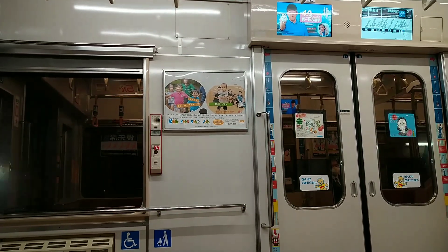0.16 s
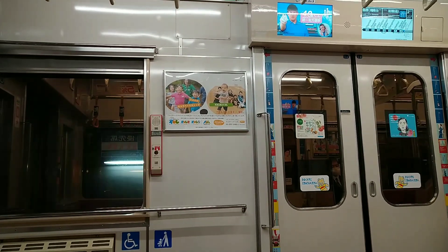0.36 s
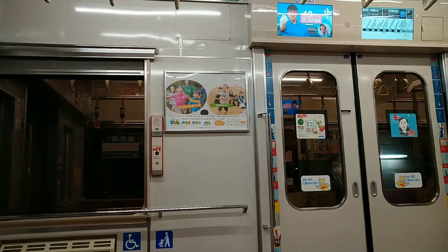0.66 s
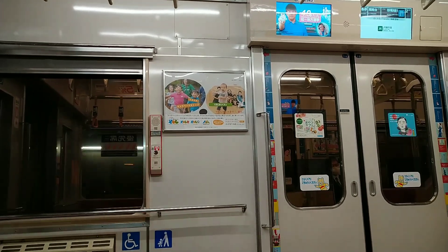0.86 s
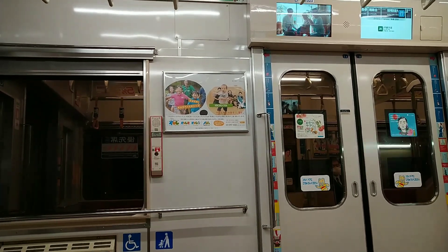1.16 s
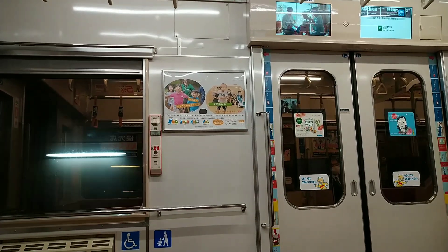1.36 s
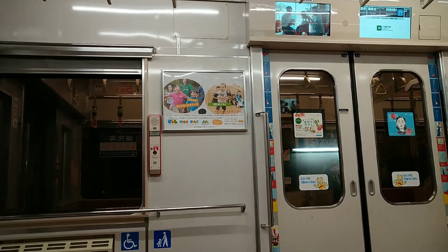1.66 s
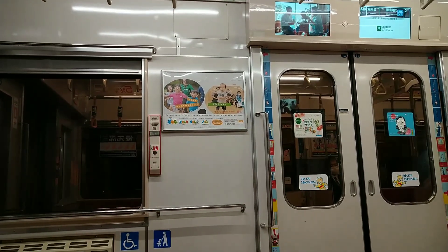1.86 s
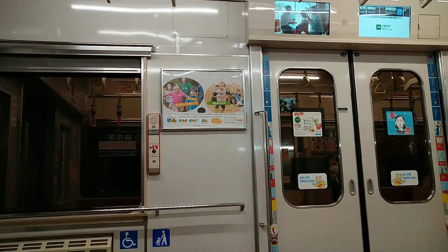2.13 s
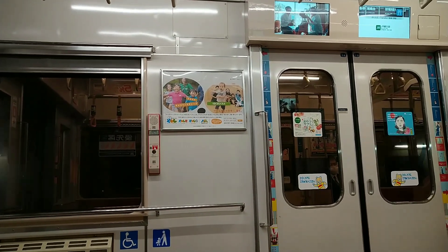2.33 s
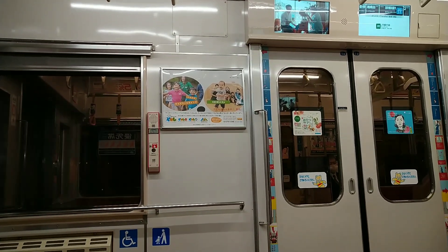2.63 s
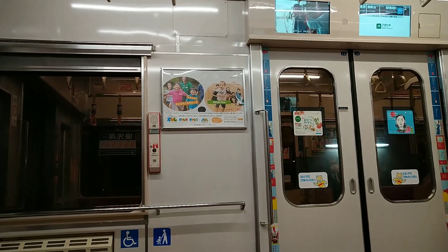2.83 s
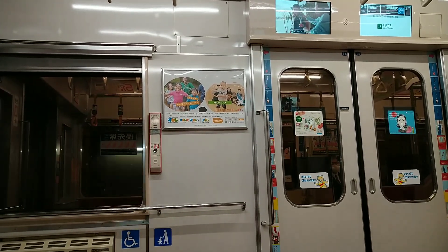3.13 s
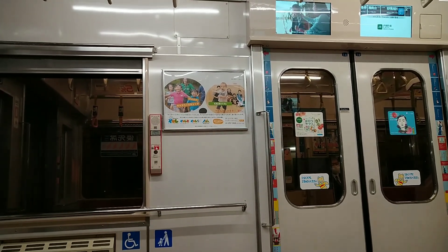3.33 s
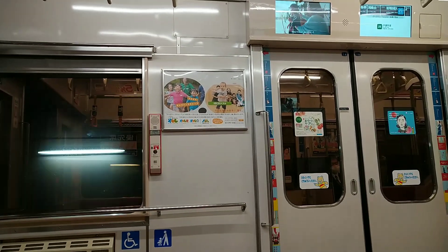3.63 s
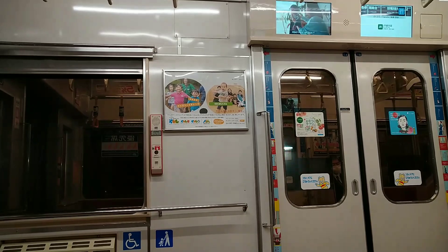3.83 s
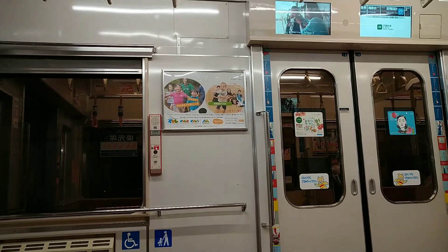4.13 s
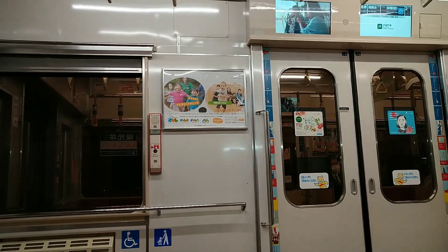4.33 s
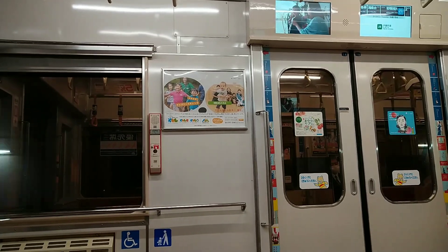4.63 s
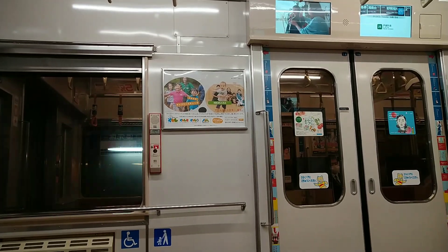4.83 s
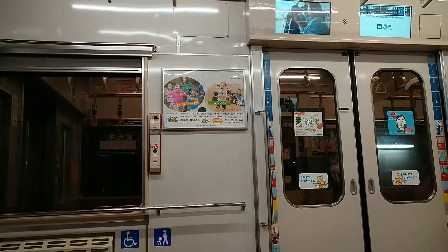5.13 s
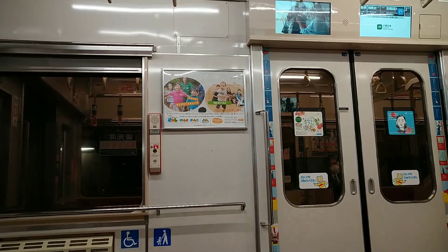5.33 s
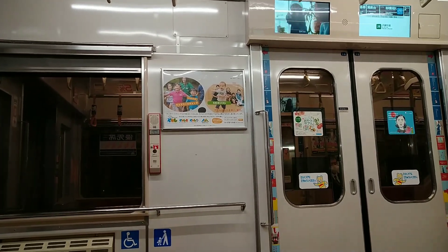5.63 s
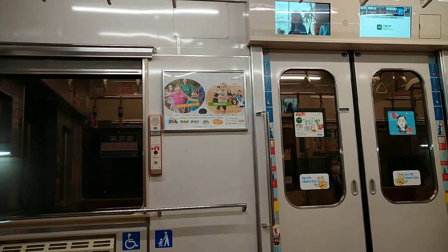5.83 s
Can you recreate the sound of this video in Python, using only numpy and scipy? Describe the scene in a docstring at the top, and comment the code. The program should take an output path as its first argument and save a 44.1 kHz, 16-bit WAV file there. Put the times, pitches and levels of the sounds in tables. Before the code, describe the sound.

The interior of an electric train running at steady speed through a tunnel, picked up in mono inside the car, with little deep bass or extreme treble. A thick, uneven low rumble runs throughout, under a midrange track roar and a thin steely ring. In the first 0.6 seconds worn track shakes the bogie, with two soft joint knocks around 0.1 to 0.2. The ride then smooths: a low drive hum slowly sinks, the bogie groans in swells, and a hollow rail howl wavers, dipping near 1.7, rising around 2.6 to 3.4, fading, then returning near 3.9. Short soft body booms come at about 3.3, 3.6 and 4.1. From 4.8 to 5.5 rougher shaking brings a cluster of dull floor thuds, strongest near 5.15. The main wheel ring weakens, other wheel tones sing faintly, and door-seal air hiss grows slightly. Rumbling continues to the end at 6 seconds.

```python
"""Inside an electric train running at steady speed through a tunnel.
From the start, random wheel and rail roughness drives the body's rumble, the track's roar and the steel's ring.
The rail howls, the bogie groans, the drive hums as drifting narrow bands, and air hisses at the door seals;
early on, worn track shakes the bogie and two joints knock decaying floor modes.
From the middle on, dips make the body boom as the hum sinks; near the end wear and joints thud
again, the strongest wheel mode is damped, and other wheel modes begin to sing faintly."""
import sys
import numpy as np
from scipy import signal
from scipy.fft import rfft, irfft, next_fast_len
from scipy.io import wavfile
from scipy.ndimage import uniform_filter1d

SR = 44100
rng = np.random.default_rng(int(sys.argv[2]) if len(sys.argv) > 2 else 0)


def transcribe(signal):
    """Save signal, clipped to [-1, 1], as a 16-bit WAV file at the path in sys.argv[1]."""
    frames = np.atleast_2d(signal).T
    limited = np.clip(frames, -1, 1)
    pcm = np.round(limited * 32767).astype(np.int16)
    wavfile.write(sys.argv[1], SR, pcm)


N = 263718


def from_db(db):
    """Amplitude ratio of a level: 20 dB is a factor of ten."""
    return 10 ** (np.asarray(db) / 20)


def seconds():
    """Sampling: the time of every sample."""
    return np.arange(N) / SR


def in_time(rows):
    """Linear interpolation of each column after the time, at every sample."""
    s, *columns = np.transpose(rows)
    return [np.interp(seconds(), s, column) for column in columns]


def ramp(start_s, rise_s):
    """Linear onset: rises from 0 to 1 and stays there."""
    return np.clip((seconds() - start_s) / rise_s, 0, 1)


def swell(centre_s, half_s):
    """Gaussian envelope of height 1, down to 1/e at half_s from its centre."""
    return np.exp(-((seconds() - centre_s) / half_s) ** 2)


def rms_one(x):
    """Normalisation to unit mean power."""
    return x / np.sqrt(np.mean(x ** 2) + 1e-20)


def steady(x, span_s):
    """Power levelling: holds the running power at 1 over this span; faster flutter stays."""
    span = max(int(span_s * SR), 2)
    return x / np.sqrt(uniform_filter1d(x ** 2, span) + 1e-20)


def drift(rate_hz):
    """Low-passed noise of spread 1, whose spectrum is 6 dB down at rate_hz."""
    size = next_fast_len(N, True)
    hz = np.arange(size // 2 + 1) * SR / size
    low_pass = (hz > 0) / (1 + (hz / rate_hz) ** 2)
    return rms_one(irfft(rfft(rng.standard_normal(size)) * low_pass, size)[:N])


def resonance(x, hz, width_hz):
    """Two-pole resonator with gain 1 at its peak: damping sets the bandwidth."""
    r = np.exp(-np.pi * width_hz / SR)
    feedback = [1, -2 * r * np.cos(2 * np.pi * hz / SR), r * r]
    return signal.lfilter(np.array([1, 0, -1]) * (1 - r * r) / 2, feedback, x)


def ring(force, hz, t60):
    """Impulse response of a damped mode: a unit click starts a sine that falls 60 dB in t60."""
    r = from_db(-60 / (t60 * SR))
    w = 2 * np.pi * hz / SR
    return signal.lfilter([0, np.sin(w)], [1, -2 * r * np.cos(w), r * r], force + 1e-18)


def shaken(colour, modes, steady_s):
    """Random excitation of a structure: coloured noise with resonances on top, at unit power."""
    points_hz, points_db = np.transpose(colour)
    hz = np.maximum(np.arange(N // 2 + 1) * SR / N, 1)
    # beyond the outer points the level falls by 12 dB an octave
    skirts = np.minimum(hz / points_hz[0], 1) ** 2 * np.minimum(points_hz[-1] / hz, 1) ** 2
    gain = skirts * from_db(np.interp(np.log(hz), np.log(points_hz), points_db))
    x = irfft(rfft(rng.standard_normal(N)) * gain, N)
    for mode_hz, width_hz, lift_db in modes:
        x = x + (from_db(lift_db) - 1) * resonance(x, mode_hz, width_hz)
    return steady(rms_one(x), steady_s)


def narrow_band(hz, half_width_hz):
    """Quadrature modulation: a carrier of wandering strength and phase fills a narrow band; unit power."""
    phase = 2 * np.pi * np.cumsum(hz * np.ones(N)) / SR
    in_phase = drift(half_width_hz) * np.cos(phase)
    quadrature = drift(half_width_hz) * np.sin(phase)
    return rms_one(in_phase + quadrature)


def drone(hz, half_width_hz, steady_s):
    """Narrow-band random vibration of a resonance, levelled to even strength at unit power."""
    return steady(narrow_band(hz, half_width_hz), steady_s)


def rolling(turns_hz, throb_db):
    """Roughness excitation: wheels on the rail drive rumble, roar and ring; wheel load modulates the rail sounds."""
    # level of the car body's rumble before wear adds to it: t/s, level/dB
    rumble = [(0, -26.5), (.85, -28.5), (2.1, -28), (2.45, -29), (3.0, -28), (4.3, -28.5), (4.65, -28),
              (5.06, -31), (5.3, -29), (5.98, -31)]
    # broad spectra of body, track roar and steel ring: f/Hz, relative density level/dB
    body_colour = [(60, -26.5), (85, -15.5), (108, -2), (150, 0), (195, 1.5), (230, -3.5), (262, 0),
                   (305, -1), (365, -3.5), (435, -11.5), (700, -35.5)]
    track_colour = [(300, -9), (430, -3.5), (480, 0.5), (545, -0.5), (610, -3.5), (770, -4.5), (900, -4),
                    (1020, -5.5), (1200, -9.5), (1500, -19), (2500, -42.5)]
    steel_colour = [(900, -10), (1280, -1.5), (1520, -3), (1900, -0.5), (2200, 2), (2560, 0), (2720, -5.5),
                    (3100, -8), (3350, -11), (3750, -15.5), (4100, -15), (4600, -26.5), (5400, -28.5),
                    (8000, -58)]
    # spectrum of the extra shaking on worn track: f/Hz, relative density level/dB
    worn_colour = [(30, -31.5), (48, -9), (80, -7.5), (135, -1.5), (225, -12.5), (315, 2.5), (420, 3.5),
                   (540, 2.5), (640, -3.5), (800, -4.5), (1000, -9), (1300, -23.5)]
    # resonances standing out of those spectra: f/Hz, bandwidth f/Hz, lift level/dB (negative: a dip)
    body_modes = [(143, 8.7, 1.5), (190, 8.3, -0.5)]
    track_modes = [(725, 28, 2.9), (826, 14, 5.8), (930, 75, 1.4)]
    steel_modes = [(1808, 160, 4.9), (2315, 280, 2.1), (3130, 100, 2.2), (3900, 140, 1.4)]
    worn_modes = [(715, 12, 8.7), (822, 18, 4.9)]
    track_start_db, steel_start_db, easing_db_per_s = -32.5, -36.5, 0.17
    body_share_of_wear = 0.43

    wear = worn_track()
    rumble_db, = in_time(rumble)
    body_gain = from_db(rumble_db) + body_share_of_wear * wear
    body = body_gain * shaken(body_colour, body_modes, steady_s=0.15)
    track = from_db(track_start_db) * shaken(track_colour, track_modes, steady_s=0.32)
    steel = from_db(steel_start_db) * shaken(steel_colour, steel_modes, steady_s=0.77)
    bogie = wear * shaken(worn_colour, worn_modes, steady_s=0.18)
    easing = from_db(-easing_db_per_s * seconds())
    # a wheel is never quite round: its load swings once a turn
    turns = np.cumsum(turns_hz * (1 + 0.01 * drift(0.98))) / SR
    load = from_db(throb_db * np.cos(2 * np.pi * turns))
    rail_sounds = easing * (track + steel) + rail_howl() + wheel_ring()
    return body + bogie + bogie_groan() + load * rail_sounds


def worn_track():
    """Exponential attenuation: the shaking grows as worn track nears, holds over it and dies away behind."""
    # stretches of worn track under the bogie: start t/s, length t/s, level/dB
    stretches = [(0.04, 0.57, -38.5), (4.84, 0.19, -31.5), (5.156, 0.293, -30.5), (5.45, 0.5, -34)]
    approach_s, leave_s = 0.091, 0.06  # time constants
    t, gain = seconds(), np.zeros(N)
    for start, length, level_db in stretches:
        before = np.maximum(start - t, 0) / approach_s
        behind = np.maximum(t - start - length, 0) / leave_s
        gain = np.maximum(gain, from_db(level_db) * np.exp(-(before + behind)))
    return gain


def rail_howl():
    """Periodic excitation: ripples in the rail head howl at a pitch set by their spacing and the speed."""
    # howl as ripple spacing and depth change along the track: t/s, f/Hz, level/dB
    howl = [(0, 888, -44.5), (.92, 880, -41.5), (1.45, 894, -43), (1.72, 815, -40), (1.98, 838, -39.5),
            (2.3, 895.5, -43.5), (2.62, 965, -41), (3.45, 989, -52), (3.9, 891, -39), (4.5, 890, -45.5),
            (5.3, 882, -50.5), (5.98, 933, -46.5)]
    hz, level_db = in_time(howl)
    return from_db(level_db) * drone(hz, half_width_hz=47, steady_s=0.3)


def wheel_ring():
    """Modal damping: the strongest wheel mode builds up in free rolling and sinks when sideways creep sets in."""
    mode_hz, wander_hz, half_width_hz = 2381, 41.97, 89
    full_db, build_db, build_s = -43, 6, 1.1
    creep_at_s, creep_rise_s, creep_damping_db = 4.47, 0.51, 4.5
    flutter_db, flutter_rate_hz = 1.1, 29
    missing_db = build_db * (1 - ramp(0, build_s))
    damping_db = creep_damping_db * ramp(creep_at_s, creep_rise_s)
    # the level flutters with the contact
    level_db = full_db - missing_db - damping_db + flutter_db * drift(flutter_rate_hz)
    hz = mode_hz + wander_hz * drift(6)
    return from_db(level_db) * drone(hz, half_width_hz, steady_s=0.31)


def bogie_groan():
    """Forced vibration: waves in the rail drive the bogie frame at a pitch set by their spacing."""
    # swells of the groan: centre t/s, 1/e half length t/s, f/Hz, peak level/dB
    groans = [(0.213, 0.08, 252, -34), (0.58, 0.1, 280, -34.5), (1.457, 0.43, 273.3, -35.5),
              (2.096, 0.67, 296, -35), (3.33, 0.3, 300, -34), (4.2, 0.15, 290, -34.5),
              (5.02, 0.08, 287, -27.5), (5.336, 0.16, 289, -31.5), (5.847, 0.15, 290, -36)]
    out = np.zeros(N)
    for s, half_s, hz, level_db in groans:
        out += from_db(level_db) * swell(s, half_s) * drone(hz, half_width_hz=9.7, steady_s=0.048)
    return out


def rail_joints(spread_db, scatter_s):
    """Modal impact response: each blow reaches the floor modes by paths of different length and strength."""
    # wheels dropping over rail joints: earliest t/s, mean level/dB
    joints = [(0.125, -22.5), (0.2, -29), (4.881, -23), (4.905, -21), (5.143, -17), (5.173, -16.5),
              (5.274, -22), (5.321, -27), (5.449, -22.5)]
    # floor modes that the blows ring: f/Hz, relative level/dB, 60 dB decay t/s
    floor_modes = [(115, -20.5, 0.096), (150, -3.5, 0.1), (185, -0.5, 0.09), (238, -8.5, 0.049),
                   (285, -7, 0.083), (348, -5, 0.09), (407, -10, 0.06), (560, -16, 0.12), (684, -16, 0.06),
                   (896, -10, 0.076)]
    s, blow_db = np.transpose(joints)
    out = np.zeros(N)
    for hz, mode_db, t60 in floor_modes:
        force = np.zeros(N)
        at = ((s + scatter_s * rng.random(len(s))) * SR).astype(int)
        force[at] = from_db(blow_db + mode_db + spread_db * rng.standard_normal(len(s)))
        out += ring(force, hz, t60)
    # the floor radiates almost nothing below its lowest mode, and the suspension dulls the blow
    return signal.sosfilt(signal.butter(5, [85, 1100], "band", fs=SR, output="sos"), out)


def body_boom():
    """Transient resonance: the car body gives a short, deep thud as it rides through each dip."""
    # dips in the track: centre t/s, peak level/dB
    dips = [(3.31, -33.5), (3.63, -30), (4.0, -35), (4.14, -34.5), (4.88, -30), (5.04, -37), (5.277, -35),
            (5.82, -38)]
    gain = sum(from_db(level_db) * swell(s, half_s=0.032) for s, level_db in dips)
    return gain * drone(72, half_width_hz=14, steady_s=0.034)


def wheel_song():
    """Creep excitation: sideways rubbing on the rail head feeds wheel modes in turn; some sag in pitch."""
    # wheel modes: onset t/s, rise t/s, starting f/Hz, sag (f/Hz per second), full width f/Hz, level/dB
    song = [(5, 0.16, 1565, 130, 180, -43.5), (4.7, 0.49, 3150, 0, 500, -55),
            (4.93, 0.6, 3620, 0, 360, -55), (4.97, 0.8, 5000, 150, 240, -63.5)]
    out = np.zeros(N)
    for onset, rise, start_hz, sag, width_hz, level_db in song:
        hz = start_hz - sag * np.maximum(seconds() - onset, 0)
        out += from_db(level_db) * ramp(onset, rise) * narrow_band(hz, width_hz / 2)
    return out


def deep_rumble():
    """Low-frequency transmission: long track waves shake the car through its suspension, lulling on smoother rail."""
    # level of the deepest rumble: t/s, level/dB
    deep_level = [(0, -40), (.27, -34), (.5, -40.5), (.68, -36), (1.7, -37.5), (1.9, -44), (2.05, -36),
                  (2.7, -37), (3.1, -38), (3.42, -39), (3.75, -38), (4.1, -36), (4.24, -42), (4.45, -42),
                  (4.53, -39), (4.95, -35.5), (5.4, -35.5), (5.55, -36.5), (5.98, -39)]
    # its broad spectrum: f/Hz, relative density level/dB
    deep_colour = [(22, -43), (31, -25), (40, -16.5), (50, -10), (62, -7), (78, -2.5), (95, 0.5), (120, -5),
                   (170, -23.5)]
    level_db, = in_time(deep_level)
    return from_db(level_db) * shaken(deep_colour, [], steady_s=0.25)


def drive_hum():
    """Narrow-band tone of the drive under load: it sinks in pitch and fades as the motors ease off."""
    # the drive's hum: t/s, f/Hz, level/dB
    hum = [(0, 163, -32.5), (.55, 165.2, -34.5), (.88, 172.9, -32), (1.1, 169, -36.5), (1.4, 168, -35.5),
           (2.15, 162.2, -34), (2.5, 155.2, -36.5), (3.9, 153, -38), (4.6, 150.2, -36),
           (5.98, 148.5, -38.5)]
    hz, level_db = in_time(hum)
    return from_db(level_db) * drone(hz, half_width_hz=8, steady_s=0.12)


def draught():
    """Flow noise: tunnel air hisses through the door seals as broad random sound."""
    # level of the hiss: t/s, level/dB
    hiss_level = [(0, -58.5), (.9, -58.5), (1.2, -59.5), (3.1, -59.5), (4.0, -63.5), (4.08, -61.5),
                  (4.33, -61), (4.72, -57), (5.33, -57), (5.52, -59.5), (5.98, -57)]
    # its broad spectrum: f/Hz, relative density level/dB
    air_colour = [(3000, -10), (4600, 1), (5400, -1.5), (5850, 3.5), (6400, 2.5), (7100, 4), (7600, 3),
                  (7900, -8), (8400, -30.5)]
    level_db, = in_time(hiss_level)
    return from_db(level_db) * shaken(air_colour, [], steady_s=0.2)


def scene():
    """Superposition: all sources add as they arrive inside the car, in one channel."""
    running = rolling(turns_hz=7.2, throb_db=0.2) + deep_rumble() + drive_hum() + body_boom()
    joints = rail_joints(spread_db=3.5, scatter_s=0.0056)
    return (running + wheel_song() + joints + draught())[None]


def record(dry):
    """Band limiting: a 0.45 ms fade-in, then bass lost below 35 Hz and a steep cut above 8450 Hz."""
    bass_cut = signal.butter(4, 35, "high", fs=SR, output="sos")
    treble_cut = signal.ellip(12, 0.1, 90, 8450, fs=SR, output="sos")
    thinned = signal.sosfilt(bass_cut, dry * ramp(0, 0.00045))
    return signal.sosfilt(treble_cut, thinned)


dry = scene()
out = record(dry)
transcribe(out)
```